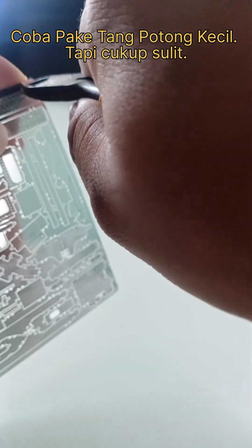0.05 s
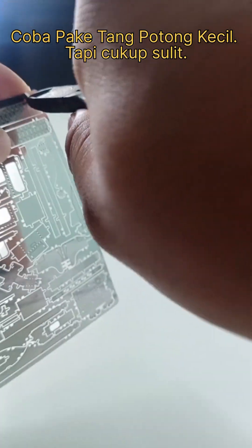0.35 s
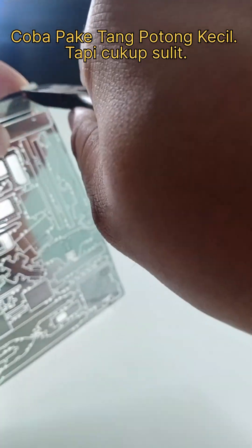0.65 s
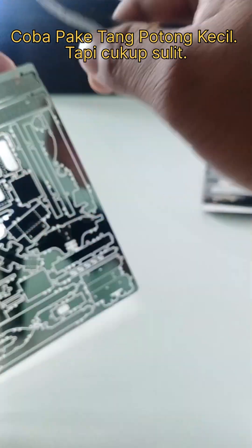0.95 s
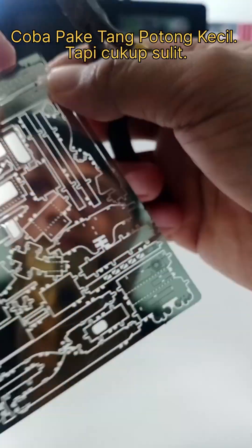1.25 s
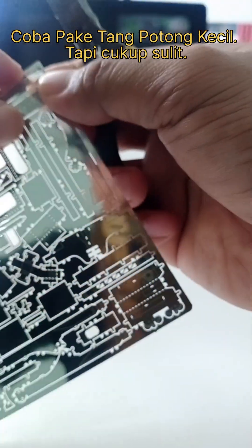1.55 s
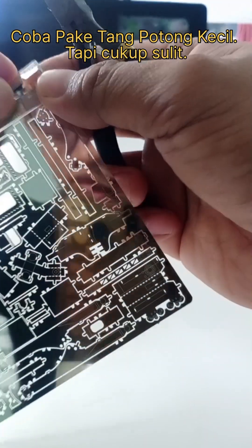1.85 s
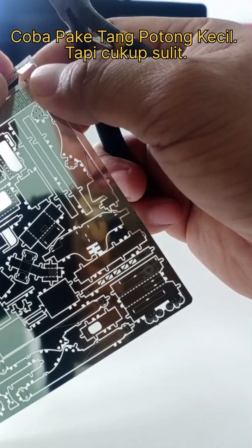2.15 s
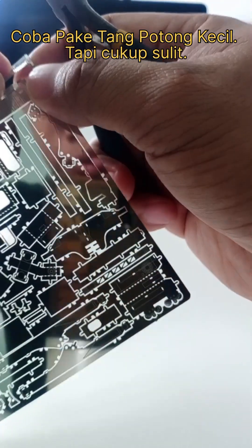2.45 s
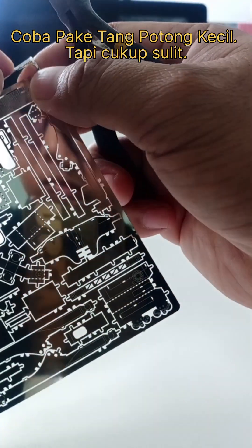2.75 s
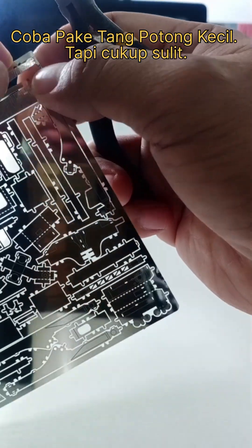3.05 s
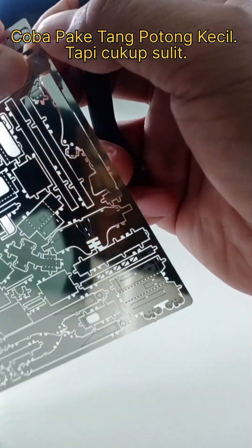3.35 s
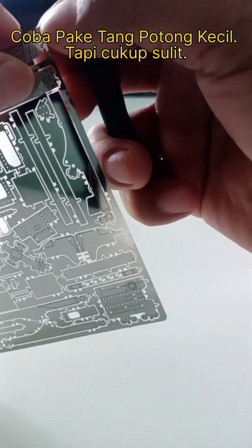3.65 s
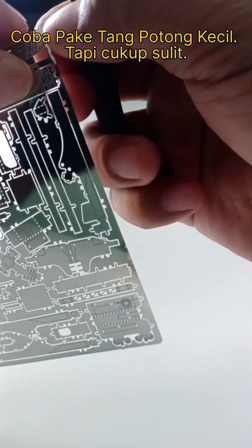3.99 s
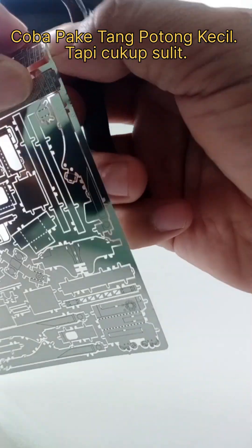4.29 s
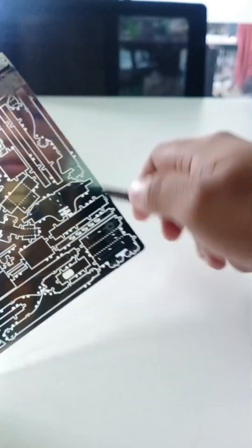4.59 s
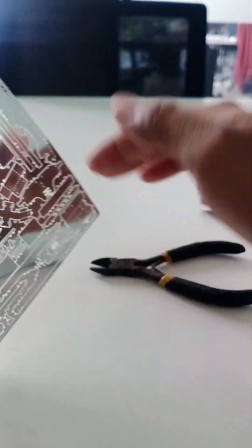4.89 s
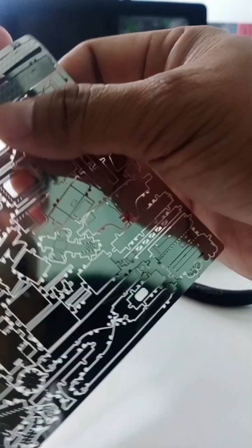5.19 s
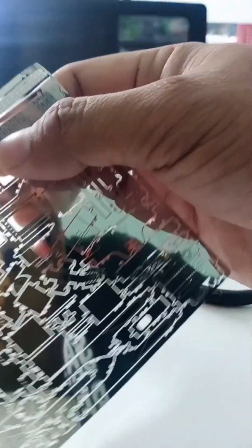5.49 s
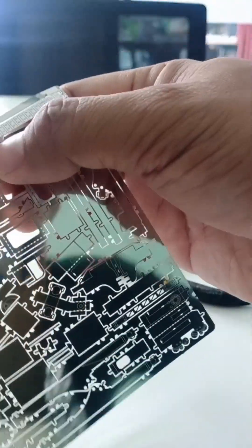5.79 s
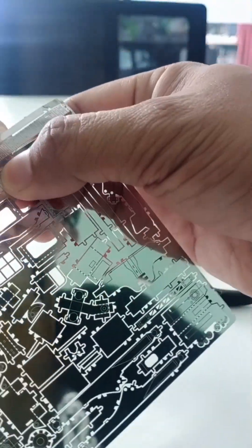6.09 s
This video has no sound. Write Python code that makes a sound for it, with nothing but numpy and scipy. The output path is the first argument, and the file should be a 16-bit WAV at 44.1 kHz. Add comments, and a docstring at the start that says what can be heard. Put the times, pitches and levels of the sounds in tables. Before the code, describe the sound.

Close up, small cutting pliers work at a thin metal sheet. For the first half second the jaws bite with hollow clicks and a scratchy creak. Bright metallic snaps come at about 0.9 and 1.5 seconds, with smaller ticks until 1.7, each leaving a brief shimmer. Fingers rub faintly on the tool. Another clink comes at 3 seconds, followed by a soft rasp of the metal edge. From 4.2 seconds the pliers rattle in the hand. At about 4.7 they land on a desk with a sharp, hollow clack, the loudest sound, then bounce, slide briefly and knock again until 5.1. Fingers then flex the sheet, giving light ringing clinks around 5.5, 5.7 and 6 seconds. Faint low handling rumble and the dull hum of a quiet room lie underneath throughout.

```python
"""Sharp ticks and hollow clacks: small cutting pliers nip a thin etched metal sheet, close up.
The metal yields in tiny snaps that set the sheet shimmering; its edge rasps on jaws and fingers.
The tool rattles in the hand, is put down, bounces on the desk and slides by stick and slip.
Fingers then flex the sheet. The hands rumble faintly and a quiet room hums behind."""
import sys
import numpy as np
from scipy import signal
from scipy.fft import rfft, irfft
from scipy.io import wavfile

SR = 44100
rng = np.random.default_rng(int(sys.argv[2]) if len(sys.argv) > 2 else 0)


def wav_record(signal):
    """Record a signal, one row per channel, as 16-bit PCM in the file named by sys.argv[1]."""
    frames = np.transpose(np.atleast_2d(signal))
    bounded = np.clip(frames, -1, 1)
    # unit amplitude maps onto the largest positive 16-bit level
    quanta = np.round(bounded * 32767).astype(np.int16)
    wavfile.write(sys.argv[1], SR, quanta)


N = 270421
TIME = np.arange(N) / SR
RING_TIME = TIME[:SR // 2]  # time axis of one response
RING_N = len(RING_TIME)


# metal-on-metal contacts: (time [s], level [dB], top octave [dB], sheet ring [dB])
CLINKS = [(0.0294, -42.5, -24, -5), (0.1756, -45, -32, 7.5), (0.424, -48.5, -35, 11), (0.679, -53, -16, -4),
          (0.8588, -32.5, -7, 3), (1.4518, -25, -11.5, 0), (1.4789, -36, -27, 2.5), (1.558, -40.5, -15, 3),
          (1.654, -43.5, -12, 4), (1.703, -30.5, -28, -6), (2.9837, -34, -16.5, 1.5),
          (4.2, -31.5, -17.5, 1.5), (4.2712, -43, -40, -16), (4.2822, -37, -35, -3),
          (4.4427, -32.5, -20, -3), (4.525, -46.5, -14, 11.5), (4.6022, -38.5, -16, 2),
          (4.6598, -16, -24.5, -16), (4.741, -34, -17.5, -19), (4.793, -36, -22.5, 9),
          (5.0739, -29.5, -24, -2), (5.24, -54, -9.5, 10.5), (5.5331, -30, -14, 1.5),
          (5.661, -25.5, -14, -4), (6.0077, -35.5, -7, -4.5)]

def clinks(gain_db=12.0, ring_db=-1.5, room_db=-5.5, bright_db=9.0, crunch_s=0.0007, snaps_per_s=1500):
    """The metal yields in a quick run of snaps, then the sheet shimmers."""
    out = np.zeros((2, N))
    for s, db, top_db, free_db in CLINKS:
        snaps = rng.standard_normal(RING_N) * (.1 + (rng.random(RING_N) < snaps_per_s / SR))
        crunch = unit_energy(snaps * np.exp(-RING_TIME / crunch_s) * soft_start(.002))
        reflections = amp(room_db + free_db) * room()[0]
        tick = unit_energy(convolve(crunch + reflections, contact_ring()))
        shimmer = amp(ring_db + free_db) * sheet_ring(s) * soft_start(.005)
        clink = shelf(tick + shimmer, 8200, top_db + bright_db)
        add(out, s, amp(db + gain_db) * clink)
    return above(out, 1900, order=4)


# metal contact spectrum: (frequency [Hz], level [dB])
CONTACT_SPECTRUM = [(1400, -15.5), (2100, -20), (2700, 6.5), (3500, -18), (4400, 4), (5200, -4.5),
                    (6000, 7.5), (7700, -6), (8900, -24), (9900, 3.5), (11000, -19), (12800, 2),
                    (14500, 11.5), (16000, -4.5)]

def contact_ring(t60_s=0.028, count=30):
    """Heavily damped modes of jaw and sheet, different at each point of contact."""
    hz = np.linspace(2200, 15800, count) + rng.uniform(-220, 220, count)
    weight = amp(read(CONTACT_SPECTRUM, hz)) * rng.uniform(0.15, 1, count)
    return stereo_modes(hz, weight, t60_s)


# clusters of close sheet modes: (frequency [Hz], spread [Hz], level [dB])
SHEET_MODES = [(2210, 110, -8), (2495, 60, 1.5), (2935, 50, -4), (3270, 130, -11), (3830, 40, -12),
               (4070, 90, -12), (4450, 35, -10), (4710, 28, -8), (5800, 180, -19), (6480, 41, -14),
               (7380, 26, -18), (7600, 53, -16), (7830, 33, -19), (8240, 56, -10), (9050, 29, -31),
               (9700, 25, -18), (10000, 28, -26), (10700, 78, -22), (11200, 37, -33), (12000, 35, -20),
               (12700, 29, -9), (13600, 28, -11), (14000, 52, -13), (14400, 22, -12), (14600, 55, -9),
               (15100, 46, -19), (15300, 28, -17), (15500, 27, -13), (15600, 33, -16), (15700, 16, -15)]

def sheet_ring(s, free_t60_s=0.34, clamped_t60_s=0.17, clamped_until_s=.75, crowd_count=110):
    """Main sheet modes plus a crowd of shorter ones, reweighted and detuned by each touch."""
    t60_s = clamped_t60_s if s < clamped_until_s else free_t60_s  # closed jaws damp the sheet
    hz, spread_hz, db = np.repeat(SHEET_MODES, 3, axis=0).T
    hz = hz + spread_hz * rng.uniform(-1.1, 1, len(hz))
    hz = hz * rng.uniform(.99, 1.01)
    main = stereo_modes(hz, amp(db) * np.sqrt(spread_hz) * rng.standard_normal(len(hz)), t60_s)
    crowd_hz = np.linspace(2000, 15800, crowd_count) + rng.uniform(-80, 80, crowd_count)
    crowd_weight = amp(read(CONTACT_SPECTRUM, crowd_hz)) * rng.standard_normal(crowd_count)
    return unit_energy(main + stereo_modes(crowd_hz, crowd_weight, t60_s / 2))


# edge on jaws and fingers: (peak time [s], level [dB], top octave [dB], rise [s], fall [s])
SCRAPES = [(0.2, -71, -87, 0.041, .04), (0.515, -52.5, -64, 0.054, 0.07), (0.801, -80, -51, 0.0076, 0.07),
           (0.868, -50.5, -59, .02, 0.071), (1.38, -70, -68.5, .03, 0.07), (3.06, -66, -92, .06, 0.2),
           (3.152, -52, -59, 0.027, 0.017), (3.2, -45.5, -48, 0.042, .085), (3.49, -66.5, -60, 0.079, .04),
           (3.625, -74, -84, .025, .08), (4.447, -53.5, -60, 0.018, 0.073), (4.542, -53, -62, 0.022, .06),
           (4.608, -61, -59, 0.02, 0.09), (4.805, -55.5, -76, .015, 0.14),
           (5.077, -40, -39.5, 0.014, 0.022), (5.558, -42.5, -45, 0.023, 0.026),
           (6.02, -56.5, -62, 0.014, 0.058), (6.087, -57.5, -65, .015, 0.046)]

def scrapes(coarse_db=1.0, ring_db=-1.5, room_db=-9.5):
    """Fine slips along the edge rasp and keep the sheet ringing."""
    grains = slips(per_s=1300, spread_db=3.5)
    treble = above(grains, 7000)
    coarse, fine = unit_rms(grains - treble), unit_rms(treble)
    out = np.zeros((2, N))
    for s, db, top_db, rise_s, fall_s in SCRAPES:
        rasp = (amp(coarse_db + db) * coarse + amp(top_db) * fine) * stroke(s, 0, rise_s, fall_s)
        start_s = max(s - 2 * rise_s, 0)
        rasp = rasp[round(start_s * SR):][:RING_N]
        contact = convolve((RING_TIME == 0) + amp(room_db) * room()[0], contact_ring())
        response = unit_energy(contact + amp(ring_db) * sheet_ring(s))
        add(out, start_s, signal.fftconvolve(rasp[None], response, axes=1))
    return above(out, 1500, order=4)


# hollow body spectrum: (frequency [Hz], level [dB])
BODY_SPECTRUM = [(30, -84), (110, -29.5), (240, -29), (430, -29.5), (690, -16), (830, -11), (960, -3),
                 (1060, -5.5), (1175, 4.5), (1390, -4), (1900, -35.5), (2700, -31), (6000, -58.5),
                 (14000, -100)]
# modes ringing on after a knock: (frequency [Hz], t60 [s], level [dB])
AFTER_RING_MODES = [(390.7, 0.22, -15), (660, 0.081, -17), (727, 0.085, -3), (920, 0.015, -13),
                    (1011, 0.12, 7.5), (1181.5, 0.067, 4), (1185, 0.35, -8.5)]
# steel jaws clicking shut: (frequency [Hz], t60 [s], level [dB])
JAW_MODES = [(2430, 0.014, 0.5), (2976, 0.026, 3), (4100, .02, -12), (5440, 0.0078, 3.5), (5650, .012, 5.5),
             (7520, .012, -5)]
# knocks of the pliers: (time [s], level [dB], hardness [dB], after-ring [dB], handle clack [dB])
KNOCKS = [(0.03, -36.5, -5, 30, -11.5), (0.208, -29.5, -2, -5, -17), (0.333, -33.5, -1, 3, -1),
          (0.394, -23, -15, -3, -28), (0.424, -27, -5, 6, -22), (0.441, -21, -2.5, -9, -33),
          (1.4541, -25.5, 11, -7, -10), (1.457, -20.5, -21, 5, -7), (1.477, -26, 13.5, -1, -18),
          (1.705, -39, -7, 6, 3), (2.986, -31, -12, 30, -15), (3.006, -32, 16.5, 9, 3.5),
          (4.198, -18.5, 6.5, -9, -23.5), (4.256, -18.5, 4, -15, -11), (4.272, -18, 0.5, -7, -11.5),
          (4.302, -19, -5, -3, -8), (4.357, -20.5, -4, -10, -25.5), (4.441, -27, 4, -19, -0.5),
          (4.451, -27, -8, -4, -24), (4.662, -0.5, 6, -3, -32), (4.721, -1.5, -15, -2.5, -28),
          (4.742, -12.5, 4.5, -6.5, -23.5), (4.7668, -3.5, -9, -7.5, -38.5), (4.791, -19, 6.5, 2.5, -19.5),
          (4.83, -25, 11.5, 10, -16), (4.947, -15, -28.5, -12.5, -19), (4.99, -14.5, -36, -14, -16),
          (5.091, -10.5, 1.5, -8.5, -12.5), (5.551, -27.5, 19, 0, -15.5), (5.56, -27, 6, -2, -16)]

def knocks(gain_db=-0.5, ring_db=-2.5, clack_db=1.5, jaws_db=-28.5, room_db=-10.0,
           clack_hz=695, clack_t60_s=0.077, detune=0.036, desk_from_s=4.65):
    """Knocks in the hand, then on the desk, ring body and handles; hard ones bring out the jaws."""
    out = np.zeros(N)
    after_ring = struck_modes(AFTER_RING_MODES, rise_s=0.0045)
    for s, db, hard_db, after_db, handles_db in KNOCKS:
        handle_hz = clack_hz * (1 + detune * rng.uniform(-1, 1))
        clack = struck_modes([(handle_hz, clack_t60_s, 0)], rise_s=0.0015)
        jaw_modes = [(hz * (1 + detune * rng.uniform(-1.1, 1)), t60_s, mode_db)
                     for hz, t60_s, mode_db in JAW_MODES]
        knock = amp(ring_db + after_db) * after_ring + amp(clack_db + handles_db) * clack
        knock += amp(jaws_db + hard_db) * struck_modes(jaw_modes, rise_s=0.0016)
        add(knock, 0, impulse(BODY_SPECTRUM, top_db=hard_db / 2, top_hz=2050))
        if s < desk_from_s:
            knock = convolve(knock, chatter())[0]
        knock = amp(db + gain_db) * knock / abs(knock).max()
        add(out, s, knock)
        add(out, s + 0.031, amp(-19) * knock)  # wall echo
    return out + amp(room_db) * convolve(out, room(rise_s=0.011)[0])


def chatter(decay_s=.012, jolts_per_s=250, jolt_db=-8.5):
    """One firm contact, then fading jolts of the loose joint."""
    jolts = rng.standard_normal(RING_N) * (rng.random(RING_N) < jolts_per_s / SR)
    envelope = np.exp(-RING_TIME / decay_s) * soft_start(.004)
    return (RING_TIME == 0) + amp(jolt_db) * jolts * envelope


# bright crack spectrum: (frequency [Hz], level [dB])
CRACK_SPECTRUM = [(3500, -31.5), (5000, 3), (7500, -5), (9000, -16.5), (12000, -14), (15000, -6.5)]

def bright_crack(at_s=4.6625, gain_db=-21, decay_s=.003, correlation=-0.66):
    """A brief, bright, wide crack on the loudest knock."""
    left, other = rng.standard_normal((2, RING_N)) * np.exp(-RING_TIME / decay_s) * soft_start(.001)
    right = correlation * left + np.sqrt(1 - correlation ** 2) * other
    out = np.zeros((2, N))
    add(out, at_s, amp(gain_db) * convolve(np.array([left, right]), impulse(CRACK_SPECTRUM)))
    return out


# resonances of the biting jaws: (frequency [Hz], level [dB])
BITE_SPECTRUM = [(200, -34), (560, -47), (700, 5.5), (830, -8), (1010, -9), (1090, -2), (1180, 8),
                 (1330, -3), (1600, -24.5), (2000, -28), (2900, -44), (5000, -50), (11000, -75)]
# bites into the sheet: (peak time [s], level [dB], rise [s], fall [s])
BITES = [(0.165, -41.5, 0.054, 0.091), (0.222, -36, 0.044, 0.028), (0.388, -34.5, 0.14, 0.016),
         (0.445, -31, 0.066, 0.13)]

def bites(gain_db=-2.0):
    """The jaws stick and slip into the sheet, sounding narrow resonances."""
    friction = strokes(BITES) * slips(per_s=900, spread_db=2.0)
    return amp(gain_db) * convolve(friction, impulse(BITE_SPECTRUM))


# resonances of the held tool: (frequency [Hz], level [dB])
GRIP_SPECTRUM = [(200, -31), (600, -39.5), (690, -15), (850, -44), (1010, 3), (1080, -7.5), (1165, 11),
                 (1260, -14), (1600, -21.5), (2900, -50), (9000, -59)]
# finger shifts: (peak time [s], level [dB], length [s])
GRIP_SHIFTS = [(0.568, -37.5, 0.058), (0.652, -44.5, 0.11), (0.728, -49.5, 0.086), (0.9, -41.5, .14),
               (1.061, -51.5, 0.058), (1.396, -55, 0.43), (1.62, -53, 0.27), (1.723, -42, 0.17),
               (1.83, -53, 0.19), (2.083, -48, 0.16), (2.426, -48, 0.28), (2.58, -49, .18),
               (2.765, -45.5, 0.11), (2.878, -56, .14), (3.196, -44, 0.27), (3.594, -49, 0.29),
               (3.749, -47, 0.17), (3.88, -49, .1), (3.996, -51, 0.21), (5.485, -43.5, 0.08),
               (5.579, -45.5, 0.21), (5.683, -44, 0.088), (5.821, -50, .12), (6.031, -45.5, 0.11),
               (6.106, -51, 0.12)]

def grip_shifts(gain_db=-0.5, rise_share=0.49):
    """Fingers shift their grip: friction noise through narrow resonances."""
    envelope = sum(stroke(s, db, rise_share * length_s, (1 - rise_share) * length_s)
                   for s, db, length_s in GRIP_SHIFTS)
    return amp(gain_db) * convolve(envelope * rng.standard_normal(N), impulse(GRIP_SPECTRUM))


# whole tool body, rubbed: (frequency [Hz], level [dB])
SLIDE_SPECTRUM = [(59, -81.5), (100, -35), (212, -34.5), (242, -21), (360, -19.5), (388, -10.5), (505, -20),
                  (633, -5.5), (750, -8), (1200, 6), (1820, -22.5), (3020, -23), (3380, -35.5),
                  (5950, -54.5), (9000, -88.5), (11700, -112), (19800, -120)]
# tool shifting as the hand lets go: (peak time [s], level [dB], rise [s], fall [s])
FUMBLES = [(4.21, -34, 0.018, 0.055), (4.282, -34, 0.036, 0.22), (4.452, -38, 0.011, 0.065),
           (4.572, -43, 0.035, 0.076)]

def fumble_and_slide(fumble_db=2.5, slide_db=-18, start_s=4.788, rise_s=0.016, push_s=0.15,
                     fade_db_per_s=82, treble_hz=1880, treble_db=-2.5, dull_db_per_s=25):
    """The tool slips from the hand, is pushed along the desk and slows; its treble fades first."""
    t = np.maximum(TIME - start_s, 0)
    sliding = np.minimum(t / rise_s, 1) * amp(slide_db - fade_db_per_s * np.maximum(t - push_s, 0))
    friction = (amp(fumble_db) * strokes(FUMBLES) + sliding) * slips(per_s=1600, spread_db=-0.5)
    rub = convolve(friction, impulse(SLIDE_SPECTRUM))
    rub = shelf(rub, treble_hz, treble_db - dull_db_per_s * t)
    # light tool, soft handles: no bass, little treble
    return above(rub, 80, order=3) - above(rub, 3700, order=5)


# large hand moves: (peak time [s], level [dB], rise [s], fall [s])
HAND_MOVES = [(4.33, -64, 0.15, 0.22), (4.69, -42, 0.023, 0.18), (4.81, -37.5, 0.087, .1),
              (4.97, -48, 0.13, 0.14)]

def hand_rumble(gain_db=-2.0, floor_db=-64.5):
    """The hands rumble faintly throughout, more in large moves."""
    spectrum_hz_db = [(30, -23), (70, -20), (130, -5), (260, -6.5), (380, -10), (600, -38), (1500, -57)]
    envelope = amp(floor_db) + strokes(HAND_MOVES)
    return amp(gain_db) * convolve(envelope * rng.standard_normal(N), impulse(spectrum_hz_db))


# puffs of air: (peak time [s], level [dB], rise [s], fall [s])
WAFTS = [(1.205, -52, .13, 0.059), (2.0, -55, 0.19, 0.081), (3.2, -54, .09, 0.031),
         (5.615, -52.5, 0.15, 0.23), (6.05, -51.5, 0.12, .2)]

def wafts(gain_db=-1.0):
    """The bending sheet pushes air in low puffs."""
    spectrum_hz_db = [(20, -26), (50, 15.5), (75, -22), (100, 25), (160, -22), (500, -49)]
    return amp(gain_db) * convolve(strokes(WAFTS) * rng.standard_normal(N), impulse(spectrum_hz_db))


# brief low hums: (peak time [s], level [dB], frequency [Hz], length [s])
HAND_HUMS = [(0.009, -47, 311.3, 0.11), (0.298, -48.5, 311.5, 0.13), (1.047, -40, 239.4, 0.1),
             (1.114, -44.5, 252.5, 0.11), (1.208, -52, 211, 0.13), (4.164, -44.5, 312.4, 0.2),
             (4.401, -46, 238, 0.18), (4.574, -50, 246, 0.13), (5.012, -36.5, 244.3, 0.17)]

def hand_hums(gain_db=-3.0):
    """Soft low tones swell and fade as the hands move."""
    out = np.zeros(N)
    for s, db, hz, length_s in HAND_HUMS:
        t = np.arange(0, length_s, 1 / SR)
        envelope = amp(db + gain_db) * np.sin(np.pi * t / length_s) ** 2
        add(out, s - length_s / 2, envelope * np.sin(2 * np.pi * hz * t))
    return out


# room decay: (frequency [Hz], t60 [s])
ROOM_DECAY = [(200, 0.71), (1100, 0.29), (3000, 0.45), (8000, 0.13), (15000, 0.31)]

def room(rise_s=0.002):
    """Diffuse two-channel reflections, each band dying at its own rate."""
    hz, t, bands = signal.stft(rng.choice([-1., 1.], (2, RING_N)), SR, nperseg=256)
    decay = amp(-60 * t / read(ROOM_DECAY, hz)[:, None])
    tail = signal.istft(bands * decay, SR, nperseg=256)[1]
    return unit_energy(tail[:, :RING_N] * np.minimum(RING_TIME / rise_s, 1) ** 2)


# room air spectrum: (frequency [Hz], level [dB])
AIR_SPECTRUM = [(15, -48.5), (25, -18.5), (108, -15.5), (223, -6), (476, -10.5), (840, -14.5), (1160, -2.5),
                (1370, 1.5), (1480, -16), (1890, -28), (2910, -25.5), (5000, -43), (9070, -51.5),
                (14800, -50), (16000, -55)]

def room_air(level_db=-56.5):
    """Steady, dull noise of the room's air."""
    return amp(level_db) * convolve(rng.standard_normal(N), impulse(AIR_SPECTRUM))


# hum partials: (frequency [Hz], level [dB])
HUM_PARTIALS = [(96.9, -67.5), (145.3, -72), (193.8, -70), (242.2, -66), (312.2, -70.5)]

def mains_hum(gain_db=-3.0):
    """Mains hum; each partial wavers in level on its own."""
    knots_s = np.linspace(0, TIME[-1], 50)
    hum = np.zeros(N)
    for hz, db in HUM_PARTIALS:
        waver = 1 + np.interp(TIME, knots_s, rng.standard_normal(len(knots_s)))
        hum += amp(db) * waver * np.sqrt(2) * np.sin(2 * np.pi * (hz * TIME + rng.random()))
    return amp(gain_db) * hum


def slips(per_s, spread_db):
    """Stick and slip: a random train of jolts of uneven size."""
    size = amp(spread_db * np.minimum(rng.exponential(1, N), 4))
    return unit_rms(size * rng.choice([-1., 1.], N) * (rng.random(N) < per_s / SR))


def stroke(s, db, rise_s, fall_s, drop_db=22.5, roundness=1.17):
    """Envelope of one movement: peak at s, drop_db lower at rise_s before and fall_s after."""
    away = np.maximum((s - TIME) / rise_s, (TIME - s) / fall_s)
    gain, near = np.zeros(N), away < 4
    gain[near] = amp(db - drop_db * away[near] ** roundness)
    return gain


def strokes(rows):
    """Envelope of a series of movements."""
    return sum(stroke(*row) for row in rows)


def stereo_modes(hz, weight, t60_s):
    """Decaying modes, each reaching the two microphone ports at its own phase."""
    phase = rng.uniform(0, 2 * np.pi, len(hz)) + 0.78 * rng.standard_normal((2, len(hz)))
    angle = 2 * np.pi * hz[:, None] * RING_TIME
    tones = (weight * np.cos(phase)) @ np.sin(angle) + (weight * np.sin(phase)) @ np.cos(angle)
    return unit_energy(tones * amp(-60 * RING_TIME / t60_s))


def struck_modes(modes, rise_s):
    """Decaying sines with a soft start, at energy 1."""
    tones = sum(amp(db - 60 * RING_TIME / t60_s) * np.sin(2 * np.pi * hz * RING_TIME)
                for hz, t60_s, db in modes)
    return unit_energy(soft_start(rise_s) * tones)


def soft_start(rise_s):
    """Smooth rise from silence."""
    return np.sin(np.pi / 2 * np.minimum(RING_TIME / rise_s, 1)) ** 2


def impulse(points, top_db=0, top_hz=9000, size=8192):
    """Minimum-phase response of a spectrum, lifted by top_db above top_hz."""
    hz = abs(np.fft.fftfreq(size, 1 / SR))
    lift_db = top_db * (1 - 1 / (1 + (hz / top_hz) ** 16))
    log_gain = np.log(amp(read(points, hz) + lift_db))
    response = np.fft.ifft(np.exp(np.conj(signal.hilbert(log_gain)))).real[:size // 2]
    return unit_energy(response * np.hanning(size)[size // 2:])


def above(x, hz, order=6):
    """Zero-phase high-pass."""
    f = np.fft.rfftfreq(x.shape[-1], 1 / SR)
    return irfft(rfft(x) * (1 - 1 / (1 + (f / hz) ** (2 * order))), x.shape[-1])


def shelf(x, hz, db):
    """Changes the level above hz by db."""
    return x + (amp(db) - 1) * above(x, hz)


def convolve(x, response):
    """Filters x, keeping its length."""
    return signal.fftconvolve(np.atleast_2d(x), np.atleast_2d(response), axes=1)[:, :x.shape[-1]]


def read(points, hz):
    """Interpolates on a log-frequency axis."""
    f, value = np.transpose(points)
    return np.interp(np.log(hz + 1), np.log(f + 1), value)


def add(mix, s, sound):
    """Mixes a sound in at time s."""
    part = mix[..., max(round(s * SR), 0):][..., :sound.shape[-1]]
    part += sound[..., :part.shape[-1]]


def amp(db):
    """Decibels to gain."""
    return 10 ** (np.asarray(db) / 20)


def unit_rms(x):
    """Scales to rms 1."""
    return x / np.sqrt(np.mean(x ** 2) + 1e-20)


def unit_energy(x):
    """Scales each channel to energy 1."""
    return x / np.linalg.norm(x, axis=-1, keepdims=True)


def scene():
    """All sources, left and right."""
    impacts = knocks() + bright_crack()
    rubbing = bites() + grip_shifts() + fumble_and_slide()
    sheet = clinks() + scrapes()
    handling = hand_rumble() + wafts() + hand_hums()
    return impacts + rubbing + sheet + handling + room_air() + mains_hum()


def record(dry, side_db=-8.5, low_cut_hz=28, side_from_hz=4760, high_cut_hz=16100):
    """Band-limited microphone; its two close ports differ only in the treble."""
    mid = above(dry.mean(0), low_cut_hz, order=3)
    side = amp(side_db) * above((dry[0] - dry[1]) / 2, side_from_hz)
    lowpass = signal.firwin(401, high_cut_hz, window=("kaiser", 8), fs=SR)
    return signal.oaconvolve(np.array([mid + side, mid - side]), lowpass[None], "same")


dry = scene()
out = record(dry)
wav_record(out)
```